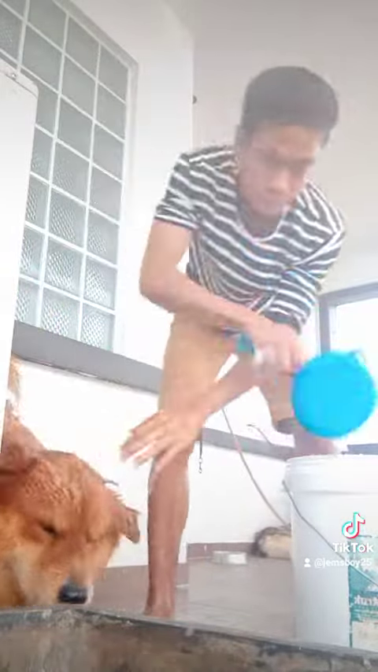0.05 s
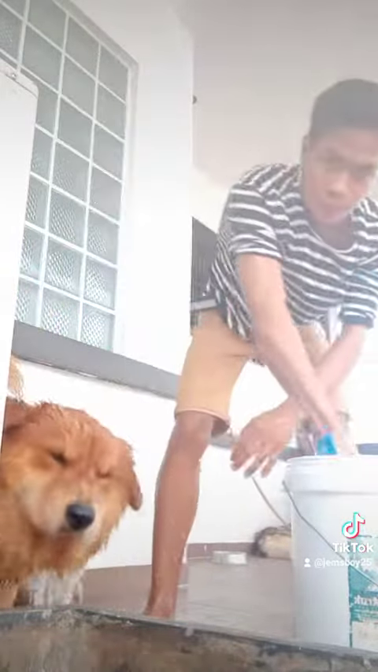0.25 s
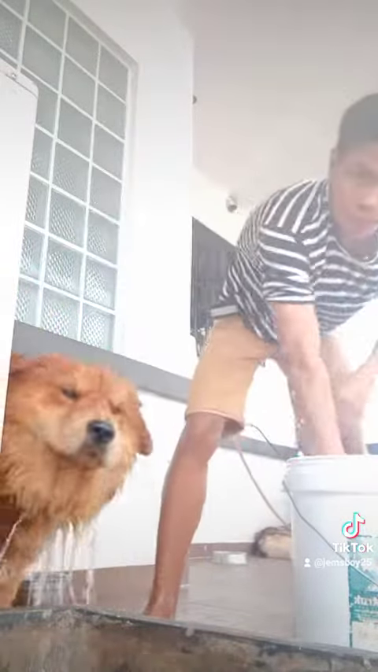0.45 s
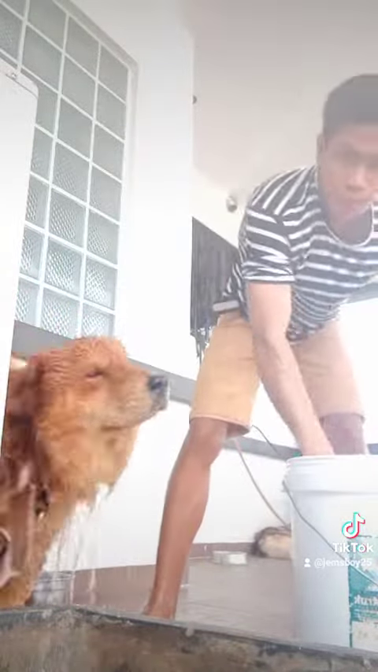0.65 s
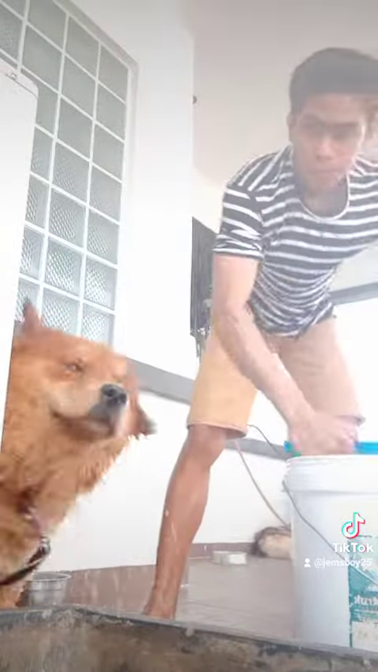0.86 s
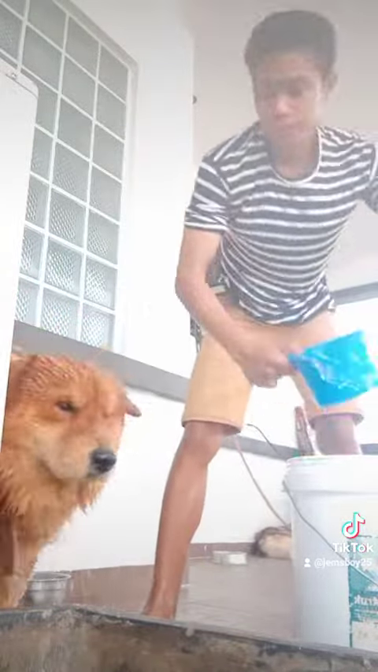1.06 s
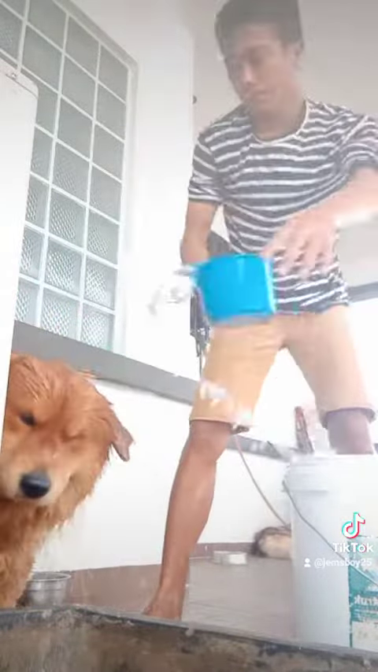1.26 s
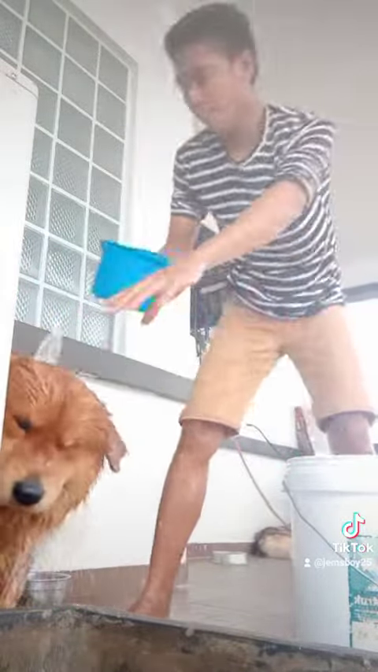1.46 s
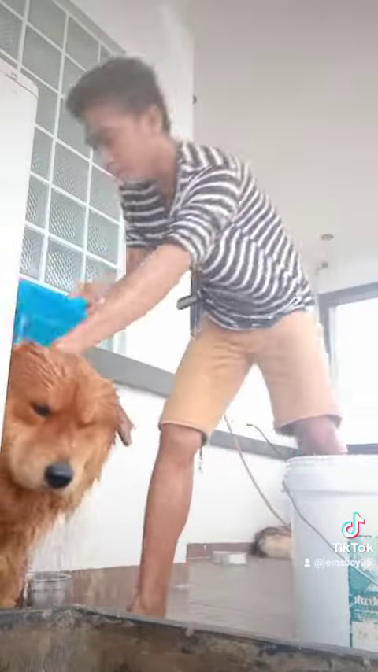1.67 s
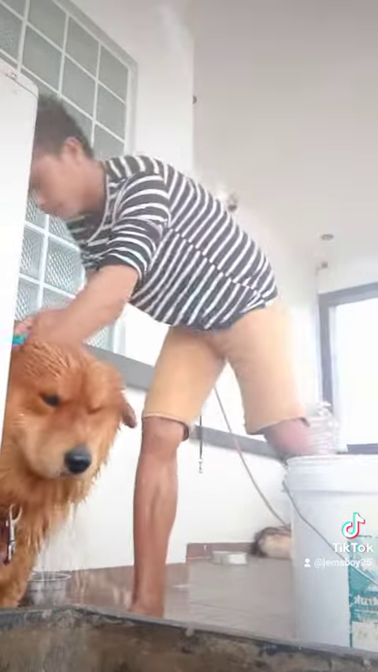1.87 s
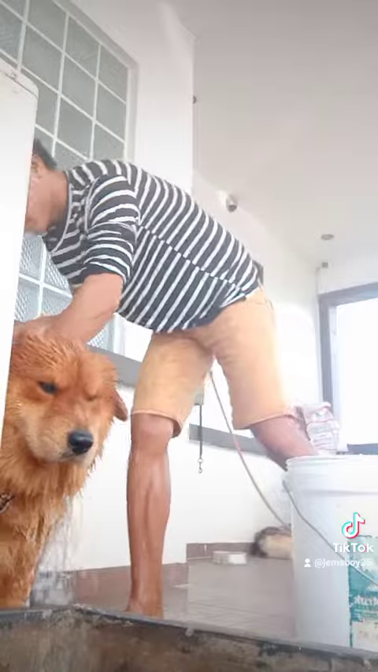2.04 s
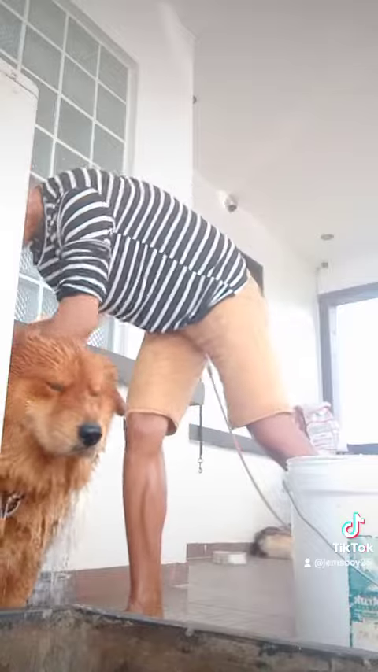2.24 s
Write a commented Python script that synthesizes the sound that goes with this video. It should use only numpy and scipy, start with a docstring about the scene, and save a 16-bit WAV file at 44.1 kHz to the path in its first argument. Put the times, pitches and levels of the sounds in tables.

```python
"""A soft footfall, then a plastic scoop knocks into a bucket on a tiled porch, under quiet outdoor air.
The scoop plunges, churns the water and pulls free with a gulp: noise bursts ring the bucket, sines are air pockets.
Water slaps the tiles, a bare foot steps over, and the scoop is emptied over a dog, whose coat dribbles:
filtered bursts, random clicks and swarms of tiny bubbles. Hard walls echo it all to a small, dull microphone."""
import sys
import numpy as np
from scipy import signal
from scipy.io import wavfile

SR = 44100
rng = np.random.default_rng(int(sys.argv[2]) if len(sys.argv) > 2 else 0)


def dump_mix(stems):
    """Bounce the given channels to the path in sys.argv[1] as a 16-bit WAV at rate SR."""
    frames = np.atleast_2d(stems).T  # one column per channel
    limited = np.clip(frames, -1, 1)  # hard clip at full scale
    pcm = np.round(limited * 32767).astype(np.int16)
    wavfile.write(sys.argv[1], SR, pcm)


N = 101430  # length in samples: 2.3 s


def amp(db):
    """Decibels to gain."""
    return 10 ** (np.asarray(db) / 20)


def unit(x):
    """Scales to an energy of one."""
    return x / np.sqrt(np.sum(x ** 2) + 1e-20)


def read(points, hz):
    """Reads a spectrum on a log-frequency axis."""
    f, value = np.transpose(points)
    return np.interp(np.log(hz + 1), np.log(f), value)


def level(points):
    """A level curve in dB over time, as a gain per sample."""
    return amp(np.interp(np.arange(N) / SR, *np.transpose(points)))


def add(mix, start_s, sound):
    """Mixes a sound in at a time, cut off at the end of the scene."""
    part = mix[max(round(start_s * SR), 0):][:len(sound)]
    part += sound[:len(part)]


def seconds():
    """Time axis of one short event, half a second long."""
    return np.arange(SR // 2) / SR


def convolve(x, response):
    """Convolves and keeps the length of x."""
    return signal.fftconvolve(x, response)[:len(x)]


def causal(db_at, size=4096):
    """Minimum-phase response with the gain db_at(Hz), so no filter sounds before its cause."""
    log_gain = np.log(amp(db_at(abs(np.fft.fftfreq(size, 1 / SR)))))
    spectrum = np.exp(np.conj(signal.hilbert(log_gain)))
    return np.fft.ifft(spectrum).real[:size // 2]


def colour(points):
    """Causal response of a spectrum table."""
    return causal(lambda hz: read(points, hz))


def hump(centre_hz, octaves, skirt_db):
    """Causal response of one broad hump; a larger skirt_db makes its flanks fall faster."""
    def db_at(hz):
        distance = np.log2((hz + 10) / centre_hz) / octaves
        return -skirt_db * np.log(1 + distance ** 2 / 2)
    return causal(db_at)


def bubble(hz, rise_s, t60_s, glide):
    """A ringing air pocket: a dying sine whose pitch glides in octaves per second until t60_s."""
    t = seconds()
    turns = np.cumsum(hz * 2 ** (glide * np.minimum(t, t60_s))) / SR
    swell = np.minimum(t / rise_s, 1)
    decay = np.exp(-np.log(1000) * np.maximum(t - rise_s, 0) / t60_s)
    return np.sin(2 * np.pi * turns) * swell * decay


def clicks(per_s, spread_db, largest=3):
    """Random clicks of uneven size and either sign, with a mean power of one."""
    excess = np.minimum(rng.exponential(1, N), largest)
    size = amp(spread_db * excess) * rng.choice([-1, 1], N)
    return unit(size * (rng.random(N) < per_s / SR)) * np.sqrt(N)


def bubbles(gain, low_hz, high_hz, per_s, cycles, spread_db, count=32):
    """A swarm of bubbles that rise in pitch; the large, low ones tend to ring longer."""
    rise_octaves = 0.092  # over each bubble's t60
    out = np.zeros(N)
    for hz in np.geomspace(low_hz, high_hz, count) * rng.uniform(.96, 1.04, count):
        t60_s = cycles * rng.uniform(1.4, 4.8) / hz
        ring = unit(bubble(hz, .5 / hz, t60_s, rise_octaves / t60_s))
        out += convolve(gain * clicks(per_s / count, spread_db), ring)
    return out / np.sqrt(count)


def burst(rise_s, fade_s):
    """A swell and fade of noise, of energy one."""
    t = seconds()
    envelope = np.minimum(t / rise_s, 1) * np.exp(-np.maximum(t - rise_s, 0) / fade_s)
    return unit(rng.standard_normal(len(t)) * envelope)


def blow(scatter_s, scatter_db):
    """One sharp impact with a noisy scatter of lesser contacts."""
    push = amp(scatter_db) * burst(scatter_s / 2, scatter_s)
    push[0] += 1
    return push


def clumps():
    """Water lands in clusters: a quickly wandering gain with a mean power of one."""
    depth_db, spacing_s = 4, .014
    knots = np.arange(0, N, spacing_s * SR)
    wander = np.interp(np.arange(N), knots, rng.uniform(-1.4, 1.1, len(knots)))
    return unit(amp(depth_db * wander)) * np.sqrt(N)


def outdoor_air():
    """Quiet, steady air beyond the porch: coloured noise."""
    # spectrum of the open air: pitch_hz, level_db
    air_spectrum = [(20, -25), (45, -11.5), (70, 1), (120, 0.5), (190, -6), (450, -11), (1000, -13),
                    (1700, -31.5), (5000, -26.5), (16000, -29)]
    return amp(-57) * convolve(rng.standard_normal(N), unit(colour(air_spectrum)))


def porch(x, build_s=0.034):
    """Direct sound, a few wall reflections and a tail that dies band by band."""
    # decay of the porch echo: pitch_hz, t60_s
    decay_times = [(100, 0.48), (400, 0.24), (1000, 0.27), (3000, 0.33), (6000, 0.47), (15000, 0.46)]
    # share of the sound that the porch throws back: pitch_hz, level_db
    echo_spectrum = [(100, -4.5), (350, -5), (800, -5.5), (2000, -3.5), (6000, -8.5), (15000, -1)]
    # reflections off the near walls: delay_s, level_db
    near_walls = [(.0052, -28.5), (.0085, -22.5), (0.016, -12), (0.0189, -20.5)]
    hz, t, bands = signal.stft(rng.standard_normal(SR), SR, nperseg=256)
    decay = np.exp(-np.log(1000) * t / read(decay_times, hz)[:, None])
    tail = signal.istft(bands * decay * np.minimum(t / build_s, 1), SR, nperseg=256)[1]
    response = convolve(unit(tail), colour(echo_spectrum))
    response[0] += 1  # direct sound
    for delay_s, db in near_walls:
        response[round(delay_s * SR)] += amp(db)
    return convolve(x, response)


def feet():
    """Bare feet: soft, dull noise thuds, and dying sines as the floor booms under shifting weight."""
    # bare feet on the floor: start_s, level_db, rise_s, fade_s
    footfalls = [(0.096, -38, 0.0028, 0.061), (1.531, -38, 0.0024, 0.039), (1.68, -73, 0.016, 0.065)]
    # spectrum of a footfall: pitch_hz, level_db
    thud_spectrum = [(30, -37.5), (60, 0), (85, 0.5), (130, 3.5), (180, -11), (320, -8.5), (500, -8.5),
                     (1000, -28.5), (2000, -79), (8000, -71)]
    # booms of the floor: start_s, pitch_hz, level_db, rise_s, t60_s
    floor_booms = [(0.094, 119, -30, 0.0041, 0.1), (1.533, 98, -39, 0.012, 0.44),
                   (1.68, 130.2, -49.5, 0.018, 0.35), (1.87, 129.2, -45.5, 0.031, 0.43)]
    out = np.zeros(N)
    for start_s, db, rise_s, fade_s in footfalls:
        thud = unit(convolve(burst(rise_s, fade_s), colour(thud_spectrum)))
        add(out, start_s, amp(db) * np.sqrt(SR * fade_s / 2) * thud)  # longer thuds carry more energy
    for start_s, hz, db, rise_s, t60_s in floor_booms:
        add(out, start_s, amp(db) * bubble(hz, rise_s, t60_s, 0))
    return out


def dribble():
    """Water gurgles off the scoop and the dog's coat: a narrow band of clustered bubbles."""
    # gurgling over time: start_s, level_db
    gurgle_level = [(0, -58), (1.1, -61.5), (1.14, -55), (1.27, -53.5), (1.36, -45), (1.48, -47.5),
                    (1.63, -58.5), (1.7, -49), (1.79, -50.5), (1.94, -54), (2.09, -47.5), (2.135, -39),
                    (2.18, -48.5), (2.3, -46.5)]
    return bubbles(level(gurgle_level) * clumps(), low_hz=809.0, high_hz=1300, per_s=760,
                   cycles=12, spread_db=3, count=16)


def spray():
    """Fine spray where water lands on bare tile: dense, bright clicks."""
    # spray over time: start_s, level_db
    spray_level = [(1.123, -65), (1.145, -33), (1.22, -57), (1.29, -48), (1.36, -44.5), (1.43, -49.5),
                   (1.49, -54), (1.53, -84), (1.94, -66), (2.06, -43.5), (2.13, -55), (2.3, -55)]
    # spectrum of the spray: pitch_hz, level_db
    spray_spectrum = [(1500, -32), (4000, -3), (7000, 4), (16000, -10.5)]
    droplets = level(spray_level) * clicks(per_s=4000, spread_db=2.5)
    return convolve(droplets, unit(colour(spray_spectrum)))


def spatter():
    """Drops on water and tiles: each lands as a tick, and tiny bubbles plink in the same clusters."""
    # spattering over time: start_s, level_db
    spatter_level = [(0, -58.5), (.04, -76), (.19, -58), (.205, -53), (.27, -47), (.3, -61), (.378, -82),
                     (.39, -52.5), (.46, -46.5), (.52, -65), (.58, -60), (.63, -48), (.72, -55), (.86, -56),
                     (.91, -57.5), (.97, -69.5), (1.02, -60), (1.05, -66), (1.122, -68), (1.138, -41),
                     (1.17, -56), (1.27, -52), (1.325, -37.5), (1.41, -56.5), (1.495, -48), (1.51, -55),
                     (1.64, -71.5), (1.68, -51), (1.82, -57), (1.93, -56), (2.02, -49), (2.065, -43),
                     (2.11, -48), (2.3, -48.5)]
    # spectrum of ticks and plinks: pitch_hz, level_db
    spatter_spectrum = [(150, -34), (500, 2), (1000, -24.5), (1600, 13), (2200, 0.5), (3300, 4.5),
                        (4500, 2.5), (6000, 1), (9000, 0), (16000, -10)]
    plink_db = -2.5  # against the ticks
    gain = level(spatter_level) * clumps()
    ticks = gain * clicks(per_s=1500, spread_db=1)
    plinks = bubbles(gain, low_hz=1845, high_hz=5285, per_s=480, cycles=13, spread_db=3, count=64)
    return convolve(ticks + amp(plink_db) * plinks, colour(spatter_spectrum))


def slaps():
    """Single blobs of water land: a first contact and its scattered droplets, through a broad hump."""
    # blobs landing: start_s, level_db, centre_hz, width_octaves, scatter_s
    blobs = [(0.2068, -16, 2970, 0.56, 0.0031), (0.252, -9, 2180, 0.29, 0.0035),
             (.495, -17, 4300, 0.55, 0.0055), (.68, -13.5, 3300, .25, 0.021),
             (1.001, -16, 4070, 0.47, 0.016), (1.124, -12, 881, 0.59, 0.014),
             (1.1941, -10, 2650, 0.78, 0.0051), (1.3104, -0.5, 1130, 0.57, 0.00073),
             (1.3109, -4.5, 2800, 0.48, 0.0041), (1.324, -17, 2410, 1.0, 0.011),
             (1.463, -14.5, 1020, 0.66, 0.0062), (1.4853, -15, 3570, 1, 0.012),
             (1.656, -18, 1140, 0.35, 0.00096), (1.8777, -15, 1800, 0.42, 0.0014),
             (1.95, -17, 4100, 0.38, 0.011), (1.976, -16, 2800, 0.32, 0.01),
             (2.177, -11, 2200, 0.44, 0.0059), (2.245, -9, 2820, 0.33, 0.0054),
             (2.2808, -13.5, 3740, 0.69, 0.0073)]
    out = np.zeros(N)
    for start_s, db, hz, octaves, scatter_s in blobs:
        slap = convolve(blow(scatter_s, scatter_db=10), hump(hz, octaves, skirt_db=15.5))
        add(out, start_s, amp(db) * unit(slap))
    return out


def churning_water():
    """Bubbles swarm in the churned bucket, under a froth of dense clicks."""
    # churning over time: start_s, level_db
    churn_level = [(0, -50.5), (.06, -61.5), (.09, -45.5), (.19, -54), (.23, -38), (.3, -75.5), (.37, -53),
                   (.4, -31), (.5, -34.5), (.62, -30.5), (.7, -30.5), (.79, -35), (.87, -36), (.96, -38.5),
                   (1.04, -35.5), (1.13, -52.5), (1.3, -54.5), (2.3, -70)]
    # spectrum of the churning: pitch_hz, level_db
    churn_spectrum = [(50, -11.5), (80, -9.5), (170, -10), (280, -3), (440, 0.5), (600, 0.5), (820, 1.5),
                      (1130, 1), (1500, 2), (1900, -14), (3000, -16), (6000, -57)]
    # froth of tiny bubbles over time: start_s, level_db
    froth_level = [(.37, -81), (.385, -54), (.46, -39), (.53, -51.5), (.65, -43), (.87, -53.5), (.93, -41),
                   (1, -73)]
    churn = bubbles(level(churn_level), low_hz=79.4, high_hz=2480, per_s=1300, cycles=7, spread_db=1.5)
    froth = level(froth_level) * clicks(per_s=14000, spread_db=2)
    return convolve(churn, colour(churn_spectrum)) + convolve(froth, unit(hump(1800, 0.66, skirt_db=18)))


def gulps():
    """Large air pockets and bubbles in the bucket: single dying sines that glide in pitch."""
    # air pockets: start_s, pitch_hz, level_db, rise_s, t60_s, glide_octaves_per_s
    air_pockets = [(.383, 274, -12.5, 0.0028, 0.022, 2), (.393, 366.1, -17, 0.0022, 0.14, 0),
                   (.413, 301, -14.5, 0.0013, 0.055, 8), (.385, 103, -31.5, 0.017, 0.29, 1),
                   (0.526, 344, -30.5, 0.019, 0.053, -2), (0.607, 1107, -27, 0.0022, 0.049, 8),
                   (.654, 1134, -24, 0.0022, 0.033, 8.5), (0.689, 461, -32, 0.0033, 0.067, 1),
                   (.72, 288, -30, 0.0035, 0.085, -13), (.852, 250.4, -34, 0.0044, 0.054, -11),
                   (.896, 787.4, -18, 0.0059, 0.19, 0.5), (.897, 918, -21.5, 0.009, 0.11, 3.5),
                   (.897, 179.5, -27, 0.012, 0.24, 2), (.903, 262, -23, 0.0078, 0.059, -5.5),
                   (.93, 712, -21, 0.0095, 0.056, -1.5), (.95, 509, -25.5, 0.0096, 0.091, 2),
                   (1.053, 513, -33, 0.0086, 0.033, 12), (1.381, 423, -46, 0.007, 0.28, -1)]
    out = np.zeros(N)
    for start_s, hz, db, rise_s, t60_s, glide in air_pockets:
        add(out, start_s, amp(db) * bubble(hz, rise_s, t60_s, glide))
    return out


def ring_bucket(push, modes):
    """The bare push plus the bucket's ring to it, together of energy one."""
    ring_db = -10.5  # against the bare push
    return unit(unit(push) + amp(ring_db) * unit(convolve(push, modes)))


def ringing_bucket():
    """Scoop knocks and softer noise bursts set off the resonances of the bucket with its water and air."""
    # resonances of the bucket: pitch_hz, level_db, t60_s
    resonances = [(270, -1.5, 0.14), (355, -8, 0.29), (493, -11.5, 0.2), (797, -3, 0.33), (867, -0.5, 0.14),
                  (1093, -4, 0.11), (1263, -2.5, 0.32), (1831, 1.5, .2), (1986, -8.5, .25)]
    # scoop against the bucket: start_s, level_db, centre_hz, width_octaves
    knocks = [(.2392, 3.5, 883, 0.63), (0.244, 0.5, 853, 0.67), (0.243, -6.5, 263, 0.16),
              (0.7634, 3, 856, 0.65), (0.772, -2.5, 318, 0.8)]
    # noise bursts that ring the bucket, first a scuff underfoot, then water shoved by the scoop:
    # start_s, level_db, rise_s, fade_s, centre_hz, width_octaves
    noise_bursts = [(0.071, -40.5, .008, 0.049, 870, 0.64), (.380, -18.5, 0.0044, 0.033, 450, 0.88),
                    (.394, -34.5, .003, 0.033, 2006, 0.094), (.436, -32.5, 0.0044, 0.045, 1590, 0.61),
                    (0.721, -63, 0.048, 0.018, 89, 0.39), (.890, -16.5, 0.0093, 0.024, 730, 1),
                    (0.901, -40.5, 0.018, 0.042, 127, 1.0)]
    rattle_s, rattle_db = 0.0052, 3  # rattle with each knock, against its first contact
    modes = sum(amp(db) * bubble(hz, 1 / hz, t60_s, 0) for hz, db, t60_s in resonances)
    out = np.zeros(N)
    for start_s, db, hz, octaves in knocks:
        push = convolve(blow(rattle_s, rattle_db), hump(hz, octaves, skirt_db=17.5))
        add(out, start_s, amp(db) * ring_bucket(push, modes))
    for start_s, db, rise_s, fade_s, hz, octaves in noise_bursts:
        push = convolve(burst(rise_s, fade_s), hump(hz, octaves, skirt_db=22.5))
        gain = amp(db) * np.sqrt(SR * fade_s / 2)  # longer bursts carry more energy
        add(out, start_s, gain * ring_bucket(push, modes))
    return out


def scene():
    """All sources echo on the porch, over quiet outdoor air that does not."""
    falling_water = dribble() + spray() + spatter() + slaps()
    bucket = churning_water() + gulps() + ringing_bucket()
    return (porch(feet() + falling_water + bucket) + outdoor_air())[None]


def record(dry):
    """A small microphone with dull treble, then a steep upper band limit."""
    # microphone response: pitch_hz, level_db
    mic_spectrum = [(20, -11), (70, 1), (540, 3), (625, -5.5), (740, 0), (1290, 1), (1370, -13),
                    (1550, -11.5), (1850, -0.5), (2400, -2), (4000, 0), (5900, -3.5), (6550, -17),
                    (7200, -18.5), (8200, -24.5), (13400, -22.5), (15000, -3), (16000, -10)]
    edge_hz = 15700
    heard = convolve(dry[0], colour(mic_spectrum))
    band_limit = signal.firwin(511, edge_hz, window=("kaiser", 9), fs=SR)
    return signal.fftconvolve(heard, band_limit, "same")[None]


dry = scene()
out = record(dry)
dump_mix(out)
```